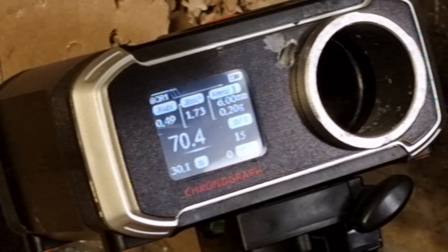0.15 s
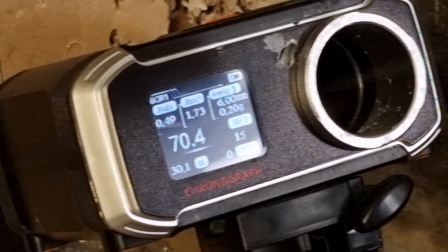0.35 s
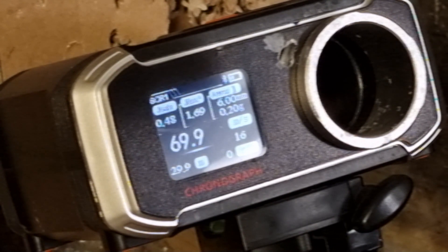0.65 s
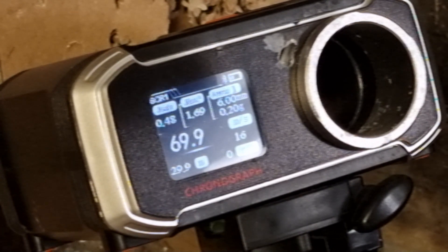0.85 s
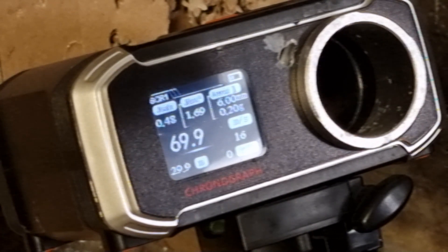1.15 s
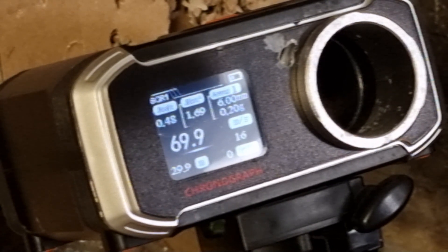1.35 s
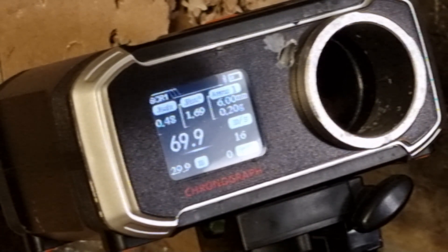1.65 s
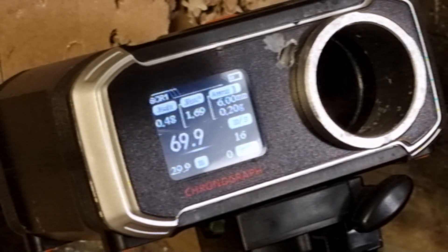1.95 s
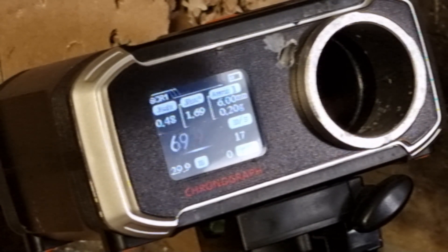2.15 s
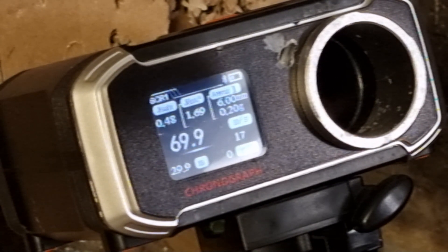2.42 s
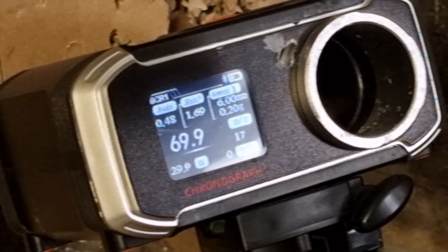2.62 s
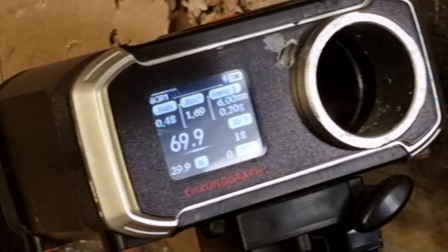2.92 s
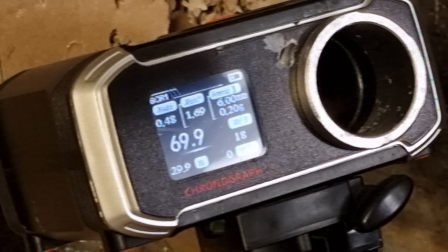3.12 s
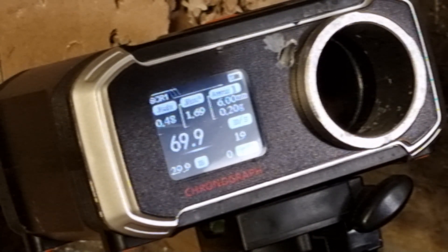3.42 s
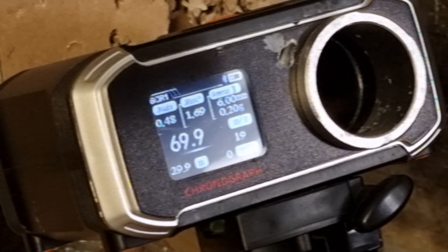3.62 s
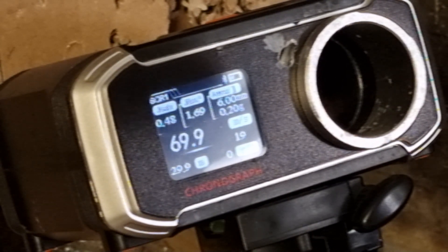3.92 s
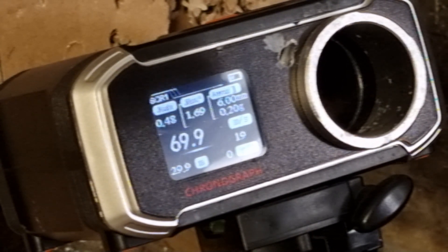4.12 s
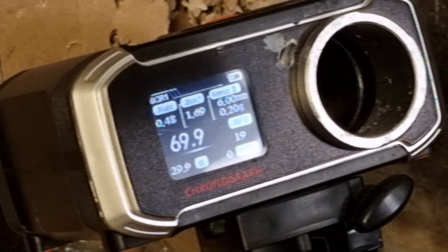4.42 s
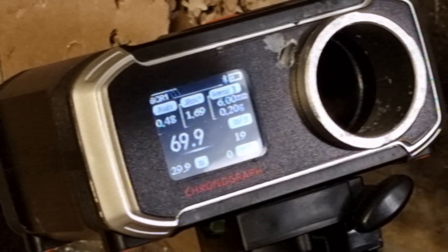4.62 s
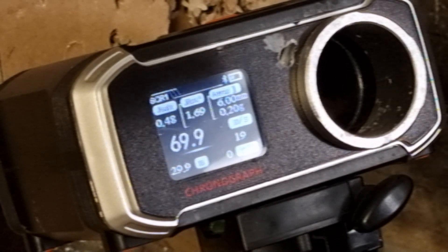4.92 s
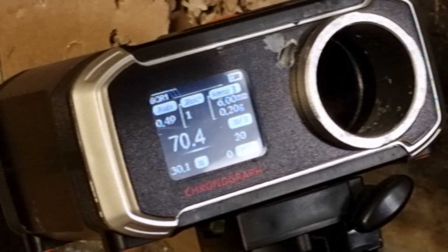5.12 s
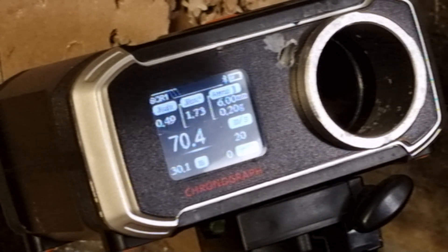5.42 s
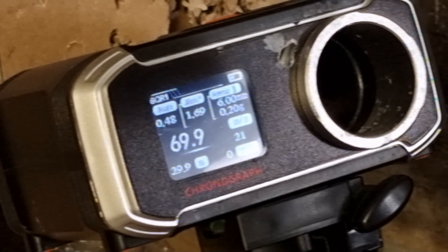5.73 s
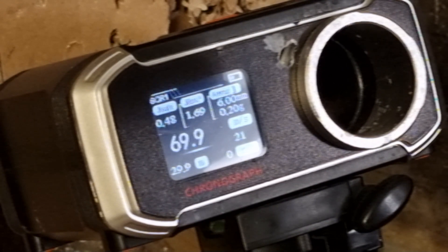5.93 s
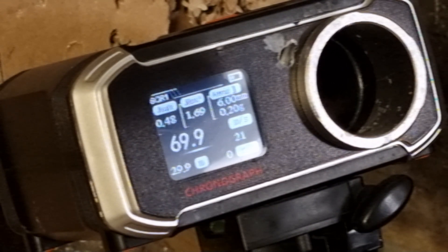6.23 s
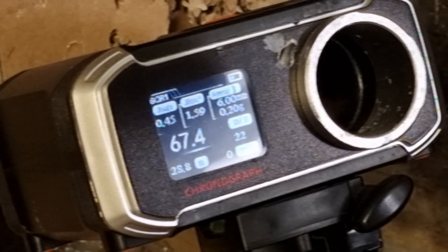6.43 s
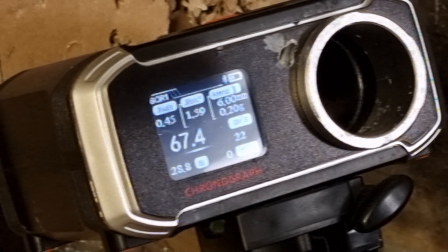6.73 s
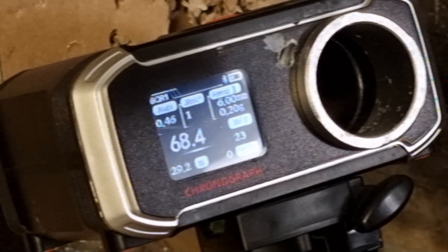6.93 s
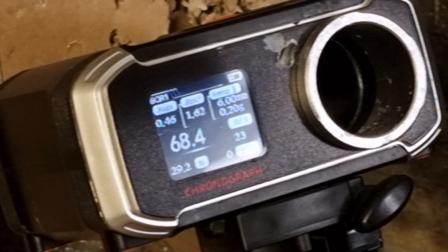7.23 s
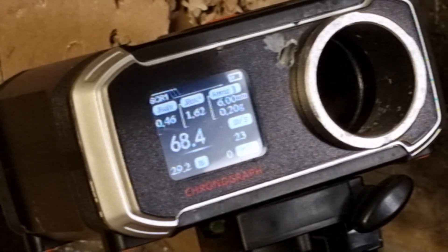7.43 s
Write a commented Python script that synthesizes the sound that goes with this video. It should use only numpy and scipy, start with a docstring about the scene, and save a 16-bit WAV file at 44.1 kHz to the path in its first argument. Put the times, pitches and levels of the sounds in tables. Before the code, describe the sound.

An electric airsoft rifle fires steady single shots in a small room, each a brief gear whir and sharp snap, with pellets bouncing between.

```python
"""An electric airsoft rifle fires single shots in a small room, close to a two-port microphone.
Each shot: the trigger clicks, motor and gears spin up, the gear catches the piston and whines against
the spring, the piston slams, the muzzle cracks, the pellet hits the target.
Between shots pellets bounce, some with a soft wash of noise around them, over the quiet air of the room."""
import sys
import numpy as np
from scipy import signal
from scipy.fft import rfft, irfft
from scipy.io import wavfile
from scipy.ndimage import uniform_filter1d

SR = 44100
rng = np.random.default_rng(int(sys.argv[2]) if len(sys.argv) > 2 else 0)


def generate_wav(sig):
    """Save sig (samples, or channels by samples) to the path in sys.argv[1] as 16-bit PCM at SR."""
    pcm = np.round(np.clip(np.atleast_2d(sig).T, -1, 1) * 32767).astype(np.int16)
    wavfile.write(sys.argv[1], SR, pcm)


N = 333378


def undb(db):
    return 10 ** (np.asarray(db, float) / 20)


def add(track, start_s, sound):
    """Mix a sound into a track."""
    i = max(int(start_s * SR), 0)
    part = track[..., i:i + sound.shape[-1]]
    part += sound[..., :part.shape[-1]]


def ring(modes, push_s, rise_s=.0001):
    """Damped modes driven by a smooth push; peak 1."""
    t = np.arange(int(.5 * SR)) / SR
    sines = sum(undb(db) * np.sin(2 * np.pi * hz * t) * 1000 ** (-t / t60) for hz, db, t60 in modes)
    attack = (1 - np.exp(-t / rise_s)) ** 2
    push = np.hanning(int(push_s * SR) + 3)
    y = np.convolve(sines * attack, push)[:len(t)]
    return y / np.abs(y).max()


def burst(t60_s, low_hz, rise_s=.0001):
    """Short crack of high-passed noise."""
    t = np.arange(int(.05 * SR)) / SR
    x = rng.standard_normal(len(t)) * 1000 ** (-t / t60_s) * (1 - np.exp(-t / rise_s)) ** 2
    return signal.sosfilt(signal.butter(2, low_hz, "high", fs=SR, output="sos"), x)


def resonate(x, peaks):
    """Parallel resonances: (centre [Hz], width [Hz], gain [dB])."""
    return sum(undb(db) * signal.lfilter(*signal.iirpeak(hz, hz / width, fs=SR), x)
               for hz, width, db in peaks)


def shaped_noise(hz, db, count):
    """Noise with the given spectral shape; rms 1."""
    bins_hz = np.maximum(np.fft.rfftfreq(count, 1 / SR), 1)
    gain = undb(np.interp(np.log(bins_hz), np.log(hz), db))
    x = irfft(rfft(rng.standard_normal(count)) * gain, count)
    return x / x.std()


# room air: (frequency [Hz], relative density [dB])
AIR_SPECTRUM = [(18, -36), (30, -4), (90, 5.5), (239, -15), (328, 3), (437, -6), (540, -1), (889, -3),
                (1280, -4), (1670, -11.5), (2830, -13), (5000, -17.5), (7270, -21.5), (10800, -32.5),
                (14400, -23.5), (16000, -30)]


def room_air():
    """Quiet steady hush, partly alike at both ports."""
    hz, db = np.transpose(AIR_SPECTRUM)
    mid, side = shaped_noise(hz, db, N), shaped_noise(hz, db, N)
    return undb(-69) * (mid + .8 * side * np.array([[1], [-1]]))


# reverberant bands: (centre [Hz], t60 [s], relative level [dB], left-right likeness [0-1])
TAIL_BANDS = [(91.5, 0.53, -20.5, 0.5), (270, 0.25, -8.5, 0), (650, .21, -5.5, 1), (1690, 0.29, -8, 0),
              (4910, 0.19, -8.5, 1), (9700, 0.25, -7, 0)]
# nearest surfaces: (left delay [s], right delay [s], gain [dB])
ECHOES = [(.0027, .0026, -5), (.0052, .0047, -7), (.0096, .0101, -8), (.0203, .0198, -13)]


def room(x):
    """Wall reflections: near echoes and a dense tail, each band dying at its own rate."""
    t = np.arange(int(.6 * SR)) / SR
    response = 0
    for hz, t60, db, alike in TAIL_BANDS:
        band_hz = [hz / 5, hz / 2.6, hz, hz * 2.6, hz * 5]
        mid, side = (shaped_noise(band_hz, [-50, -14, 0, -14, -50], len(t)) for _ in range(2))
        pair = np.sqrt(1 + alike) * mid + np.sqrt(1 - alike) * side * np.array([[1], [-1]])
        response += undb(db) * np.sqrt(hz / SR) * pair * 1000 ** (-t / t60)
    response *= np.clip(t / .0013, 0, 1) * undb(-20)
    for left_s, right_s, db in ECHOES:
        response[[0, 1], [int(left_s * SR), int(right_s * SR)]] += undb(db)
    return signal.fftconvolve(x[None], response, axes=1)[:, :N]


# soft noise washes: (time [s], length [s], level [dB], centre [Hz], width [Hz])
WASHES = [(0, 0.17, -45, 1330, 2550), (2.354, 0.04, -45, 8300, 7040), (3.025, 0.093, -43, 1000, 1500),
          (3.141, 0.068, -43, 4930, 5930), (3.653, 0.035, -48, 2215, 3140), (4.978, 0.2, -43.5, 2400, 4110)]


def noise_washes():
    """Grainy band noise that swells and fades around and after some pellet taps."""
    out = np.zeros((2, N))
    for start_s, length_s, db, hz, width_hz in WASHES:
        count = int(length_s * SR)
        grains = np.repeat(undb(3 * rng.standard_normal(count // 64 + 1)), 64)[:count]
        noise = grains * rng.standard_normal((2, count)) * np.sqrt(np.hanning(count))
        band = [(hz, width_hz, 0)]
        wash = resonate(resonate(noise, band), band) * np.sqrt(SR / width_hz / np.pi)
        add(out, start_s, undb(db) * wash)
    return out


# bounces and knocks: (time [s], ring [dB], pitch [Hz], tick [dB], left minus right [dB])
TAPS = [(.006, -29, 1260, -37.5, 1), (.042, -43, 1420, -65, 13.5), (.057, -31, 747, -44, -12),
        (0.084, -27, 1170, -71, -8), (0.124, -21, 1414, -53, -7), (.184, -39.5, 720, -36.5, -14.5),
        (0.266, -54.5, 1123, -38.5, 6), (.502, -11, 270, -52, -1), (0.5837, -2.5, 1750, -12, -11),
        (1.217, -69, 1015, -36.5, 0), (1.698, -11, 1185, -20, -5.5), (1.727, -41.5, 1183, -22, -9),
        (1.834, -48.5, 3240, -33.5, -24.5), (1.929, -29, 780, -25, -14.5), (1.938, -10.5, 900, -29.5, -5),
        (2.264, -16.5, 898, -25, -10.5), (2.368, -71.5, 1114, -36, 4), (2.44, -47, 357, -45, -11.5),
        (2.497, -41, 407, -43, -14.5), (2.544, -44, 1220, -29.5, 3.1), (2.586, -60.5, 336, -34, -16.5),
        (2.69, -11, 516, -45, -3.5), (3.026, -44.5, 1200, -40, -9.5), (3.037, -25.5, 1000, -23.5, -6),
        (3.064, -36.5, 1083, -45, -15.5), (3.157, -63, 3305, -43, -8.5), (3.204, -34.5, 1000, -23.5, -12),
        (3.384, -4.5, 650, -26, -5.5), (3.666, -30, 1100, -59, 2.5), (3.7006, -22.5, 1125, -40, -5.5),
        (3.723, -27, 1330, -44.5, -7), (3.75, -16.5, 1440, -40, -0.5), (4.504, -21, 275, 3.5, 4.8),
        (4.584, -12.5, 1333, -16.5, -2.1), (4.702, -43.5, 249.7, -34.5, -2.5), (4.845, -33, 653, -66, -12),
        (4.901, -45, 269, -73, -3.5), (4.977, -28.5, 1910, -63, -5), (5.028, -29, 2030, -45, -3.5),
        (5.396, -49, 580, -74.5, -17), (6.46, -24, 1014, -26.5, -2), (6.6029, -31, 910, -14.5, -6.5),
        (7.107, -32, 973, -23.5, -4)]
# struck object: (frequency / pitch [ratio], relative level [dB])
TAP_MODES = [(0.619, -8.5), (1, -1), (1.47, -7), (1.86, -7), (2.401, -14)]


def pellet_taps():
    """Each tap briefly rings the thing it meets, under a bright tick."""
    out = np.zeros((2, N))
    for start_s, ring_db, hz, tick_db, pan_db in TAPS:
        pan = undb([[pan_db / 2], [-pan_db / 2]])
        modes = [(ratio * hz, db, 13 / hz) for ratio, db in TAP_MODES]  # t60 of 13 cycles
        add(out, start_s, undb(ring_db) * pan * ring(modes, push_s=.35 / hz, rise_s=.0014))
        add(out, start_s, undb(tick_db) * pan * burst(t60_s=.022, low_hz=2490, rise_s=.0021))
    return out


# target: (frequency [Hz], relative level [dB], t60 [s])
TARGET_MODES = [(600, -1, .022), (790, -2, .014), (950, 0, .022), (1300, -6, .014), (3000, -12, .012)]


def target_hit():
    """Thud and crack; each pellet lands on another spot, so the modes vary."""
    scatter = rng.standard_normal((len(TARGET_MODES), 2)) * [.06, 4]
    modes = [((1 + detune) * hz, db + offset_db, t60)
             for (detune, offset_db), (hz, db, t60) in zip(scatter, TARGET_MODES)]
    hit = ring(modes, push_s=.0004, rise_s=.0005)
    add(hit, 0, undb(-7.5) * burst(t60_s=.014, low_hz=2500))
    return hit


PINION_TEETH = 11


def mesh_whine(teeth):
    """Tone at the tooth rate; sidebands make it throb once a shaft turn."""
    phase = 2 * np.pi * teeth
    shaft = phase / PINION_TEETH
    lower_gain = .45 * undb(4.5 * rng.standard_normal())
    sidebands = lower_gain * np.sin(phase - shaft) + .19 * np.sin(phase + shaft)
    return np.sin(phase) + sidebands + .067 * np.sin(2 * phase)


def tooth_impacts(teeth):
    """Noise pulsing once a tooth, each impact of uneven strength."""
    strength = undb(3.2 * rng.standard_normal(len(teeth))[teeth.astype(int)])
    pulses = .38 + np.exp(-(teeth % 1) / .31)
    return strength * pulses * rng.standard_normal(len(teeth))


MOTOR_ON_S, CUT_S, STOP_S = -.038, .064, .1  # from the catch
CATCH_HZ, TOP_HZ, SETTLE_S = 2113.5, 2916, .026  # tooth rate
SPIN_UP_HZ_PER_S, COAST_HZ_PER_S = 40000, 43000
# gearbox shell and grip round the motor: (centre [Hz], width [Hz], relative gain [dB])
GEARBOX_PEAKS = [(645, 790, -12), (2395, 810, -2.5), (2877, 270, -1), (3486, 770, 2.5), (4120, 120, -6),
                 (4804, 250, -0.5), (6560, 150, -4), (9200, 3200, -30), (13800, 3900, -16)]
GRIP_PEAKS = [(1270, 110, 0)]


def gears(lead_s):
    """The motor spins up, loads the spring, is cut and coasts; teeth rattle the shell, buzz the grip."""
    t = np.arange(MOTOR_ON_S, STOP_S, 1 / SR)
    before_s, driven_s, coast_s = np.maximum(-t, 0), np.clip(t, 0, CUT_S), np.maximum(t - CUT_S, 0)
    tooth_hz = TOP_HZ - (TOP_HZ - CATCH_HZ) * np.exp(-driven_s / SETTLE_S)
    tooth_hz = tooth_hz - SPIN_UP_HZ_PER_S * before_s - COAST_HZ_PER_S * coast_s
    wobble = .1 * uniform_filter1d(rng.standard_normal(len(t)), size=100)  # 1 % rms
    teeth = np.cumsum(tooth_hz * (1 + wobble)) / SR + PINION_TEETH * rng.random()
    spring_load = np.exp(-.5 * ((t - .026) / .013) ** 2)

    impacts = tooth_impacts(teeth)
    rattle = resonate(impacts, GEARBOX_PEAKS) + .083 * impacts
    rattle_db = np.maximum(-9 - 328 * before_s - 2997 * coast_s, -45.5)
    buzz = resonate(impacts, GRIP_PEAKS)
    buzz_db = -13.5 - 251 * before_s - 804 * coast_s - 18.5 * spring_load  # the load stills the grip
    housing = undb(rattle_db) * rattle / rattle.std() + undb(buzz_db) * buzz / buzz.std()

    swell = np.clip((t - MOTOR_ON_S) / .014, 0, 1) ** 2
    slack_db = -17 * np.clip((-lead_s - t) / .0042 + .5, 0, 1)  # quiet until the gear play is taken up
    return swell * undb(slack_db) * housing + undb(-7.5) * spring_load * mesh_whine(teeth)


# from the catch
TRIGGER_S, SPRING_S, SLAM_S, MUZZLE_S, REBOUND_S, TARGET_S = -.038, .031, .0483, .0568, .0603, .0697
# rifle parts and rest: (frequency [Hz], relative level [dB], t60 [s])
TRIGGER_MODES = [(800, 0, .015), (1250, -10, .02), (2900, -14, .01), (5000, -18, .01)]
RECEIVER_MODES = [(540, -14, 0.01), (734, 2.5, .018), (1250, -5.5, .018), (2680, -10, .01),
                  (3600, -13.5, .01)]
CYLINDER_MODES = [(200, -11, .06), (290, -5.5, 0.054), (426, -4.5, 0.01), (790, -4.5, 0.0079)]
STAND_MODES = [(59.8, -9, 0.45), (69.5, -4, 0.26), (98, 1, 0.087), (195, -12, 0.033)]
# shots: (catch time [s], gear lead [s], trigger [dB], catch [dB], slam [dB], muzzle [dB], target [dB])
SHOTS = [(0.359, 0.017, -27, 1.5, -4.5, -10, -2), (0.9579, 0.019, -25.5, 1, -5.5, -19, 1.5),
         (1.5017, 0.02, -25, 1, -4.5, -7, -3), (2.0943, 0.021, -28, 1, -5.5, -12.5, 2.1),
         (2.7161, .022, -25.5, 1.5, -5.5, -14, -11), (3.2712, 0.027, -27.5, -1, -4.5, -9, 0),
         (3.8407, 0.018, -27.5, 1.5, -7.5, -27, 0.5), (4.408, 0.02, -27, -2.4, -4, -3, -7),
         (5.0686, 0.021, -24, 0.5, -5.5, -27, 0), (5.6468, 0.018, -28, -0.5, -6.5, -26, 1.4),
         (6.2569, 0.022, -25, 1.5, -5, -30, -13), (6.8722, 0.024, -28.5, 1, -5.5, -21, -4.5),
         (7.5417, 0.02, -25, -4, -7, -13, -8)]


def rifle():
    """Gears draw the piston, the spring drives it home, the pellet flies; rifle and target tracks."""
    gun, hits = np.zeros(N), np.zeros(N)
    click = ring(TRIGGER_MODES, push_s=.0004, rise_s=.0011)
    knock = ring(RECEIVER_MODES, push_s=.0002)
    slam = -ring(CYLINDER_MODES, push_s=.0006)
    shudder = ring(STAND_MODES, push_s=.0013)
    for catch_s, lead_s, trigger_db, catch_db, slam_db, muzzle_db, target_db in SHOTS:
        add(gun, catch_s + TRIGGER_S, undb(trigger_db) * click)
        add(gun, catch_s + MOTOR_ON_S, gears(lead_s))
        add(gun, catch_s, undb(catch_db) * knock)
        add(gun, catch_s + SPRING_S, undb(slam_db - 16.5) * shudder)  # tightening spring shakes the rest
        add(gun, catch_s + SLAM_S, undb(slam_db) * (slam + undb(-18) * shudder))
        add(gun, catch_s + MUZZLE_S, undb(muzzle_db) * burst(t60_s=.013, low_hz=4000))
        add(gun, catch_s + REBOUND_S, undb(slam_db + 1.5) * knock)  # piston knocks the receiver again
        add(hits, catch_s + TARGET_S, undb(target_db) * target_hit())
    return gun, hits


def scene():
    """Direct sound and reflections; the left port faces away, so the rifle is later and duller there."""
    gun, hits = rifle()
    taps = pellet_taps()
    delayed = np.pad(gun, (16, 0))[:N]
    gun_left = undb(-4.5) * signal.lfilter([1], [1, -.25], delayed)
    direct = np.array([gun_left, gun]) + hits + taps
    tap_reverb = room(undb(-8.5) * taps.mean(axis=0))  # further off: own room response
    shot_reverb = room(.6 * gun + .48 * hits)
    return direct + tap_reverb + shot_reverb + room_air() + noise_washes()


def record(dry):
    """The microphone drops the deepest bass, peaks clip in the converter, the top is cut."""
    low_cut = signal.butter(4, 62, "high", fs=SR, output="sos")
    high_cut = signal.ellip(8, .2, 60, 15900, fs=SR, output="sos")
    clipped = np.clip(signal.sosfilt(low_cut, dry), -1, 1)
    return signal.sosfilt(high_cut, clipped)


dry = scene()
out = record(dry)
generate_wav(out)
```